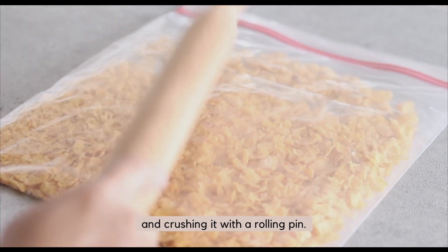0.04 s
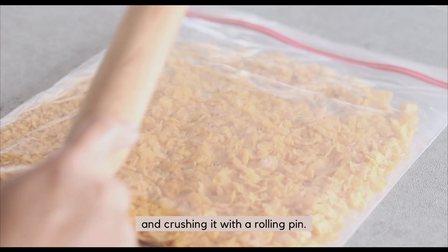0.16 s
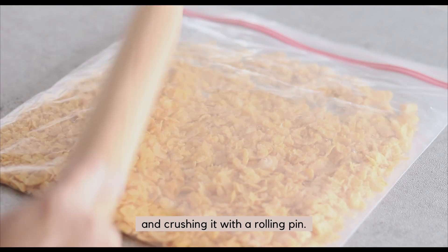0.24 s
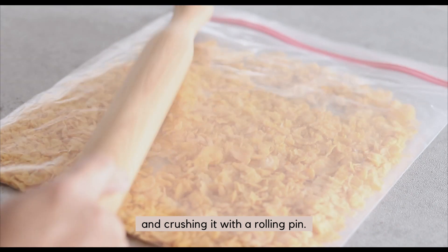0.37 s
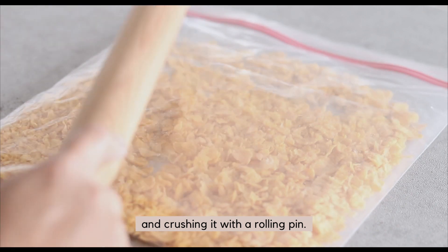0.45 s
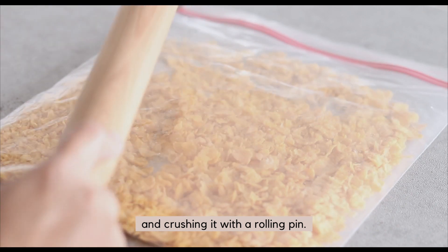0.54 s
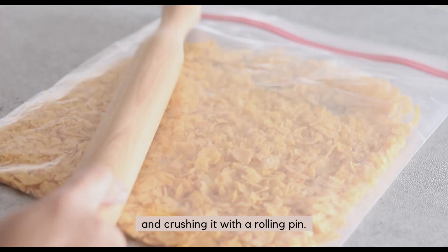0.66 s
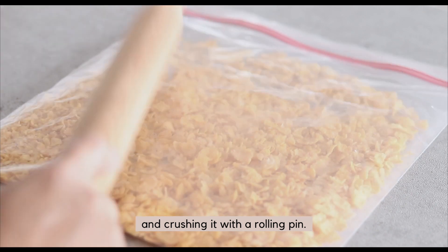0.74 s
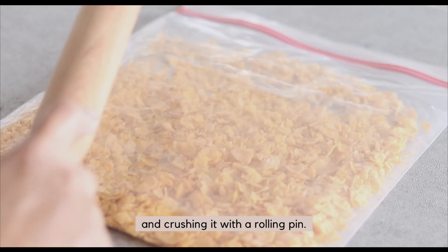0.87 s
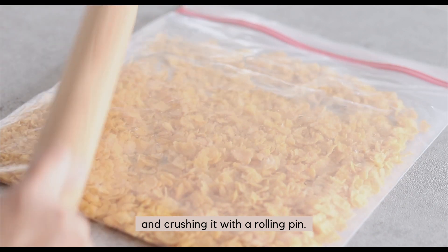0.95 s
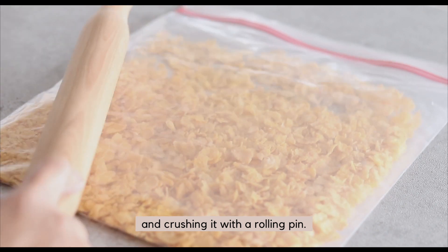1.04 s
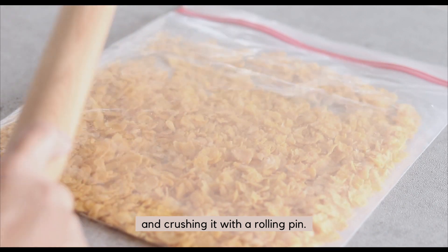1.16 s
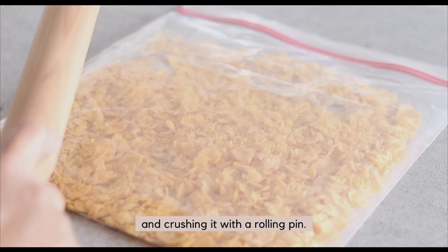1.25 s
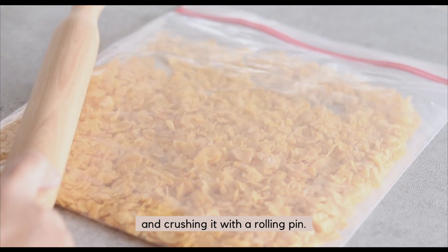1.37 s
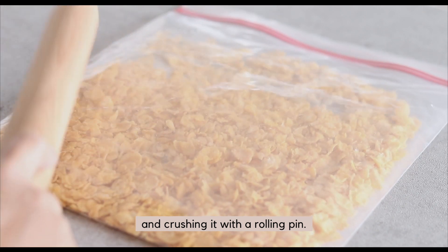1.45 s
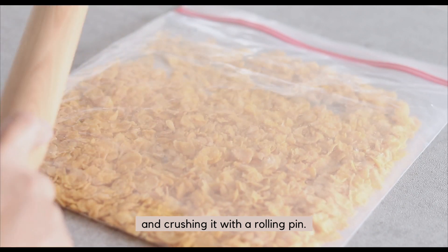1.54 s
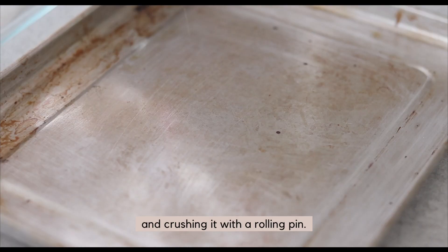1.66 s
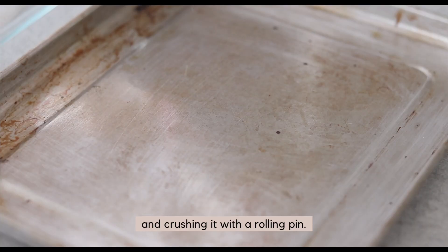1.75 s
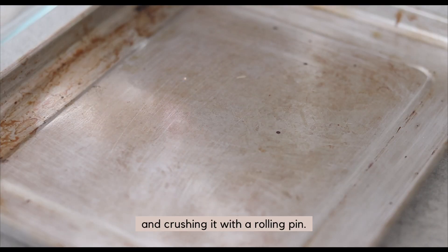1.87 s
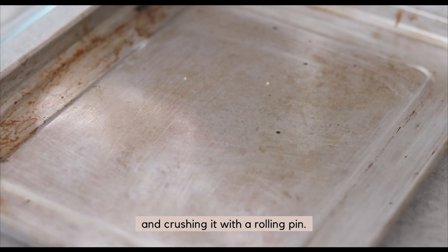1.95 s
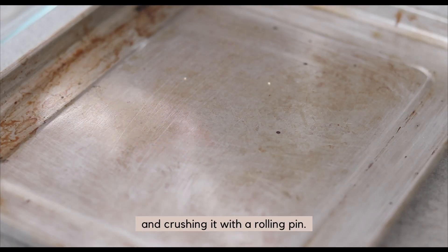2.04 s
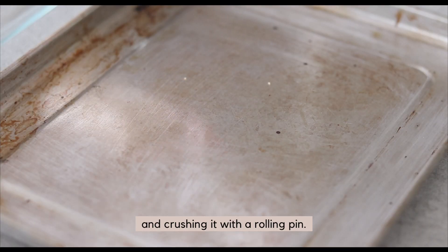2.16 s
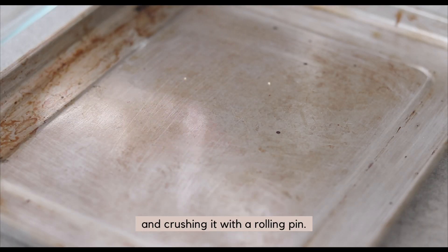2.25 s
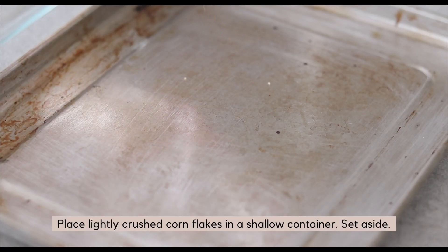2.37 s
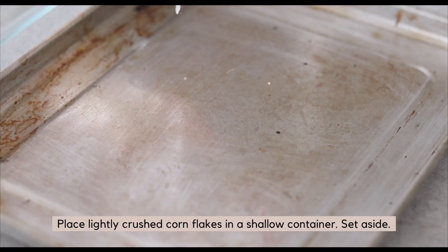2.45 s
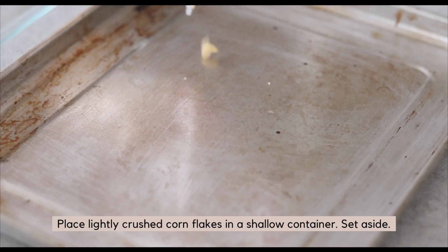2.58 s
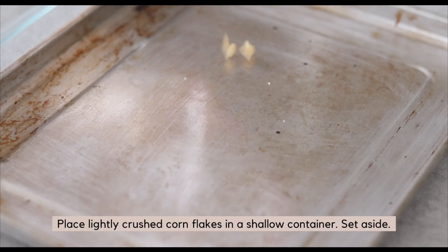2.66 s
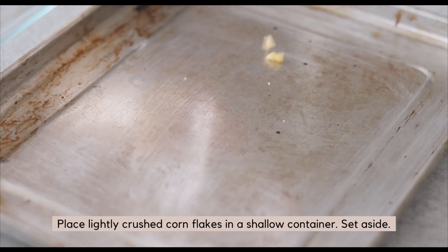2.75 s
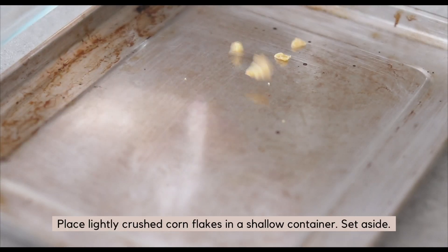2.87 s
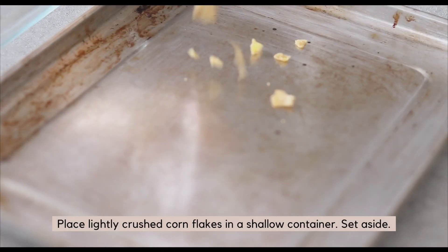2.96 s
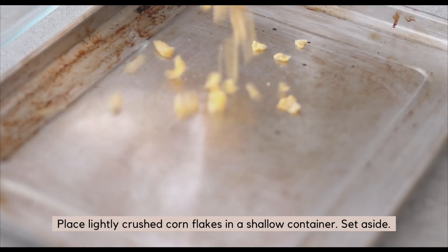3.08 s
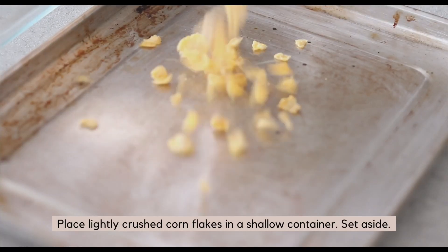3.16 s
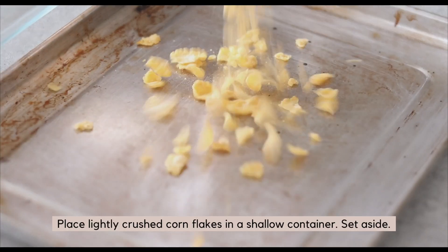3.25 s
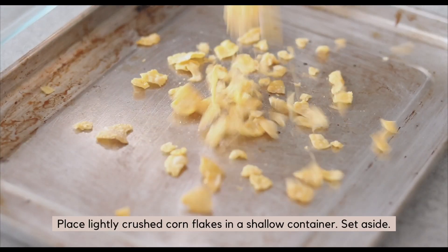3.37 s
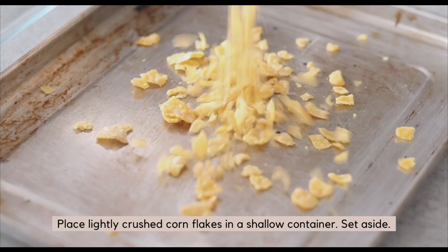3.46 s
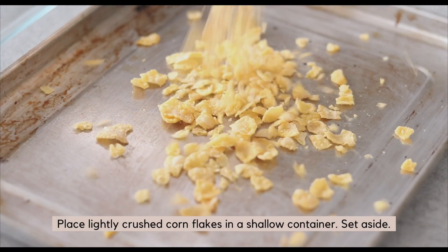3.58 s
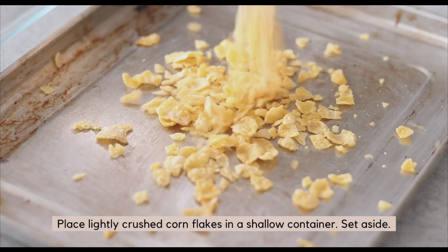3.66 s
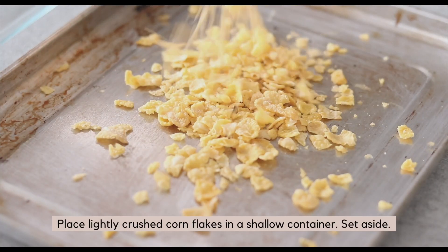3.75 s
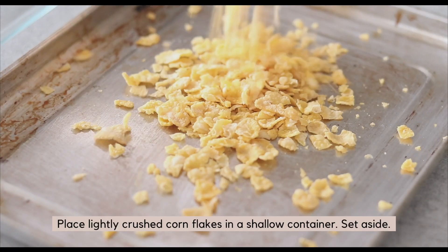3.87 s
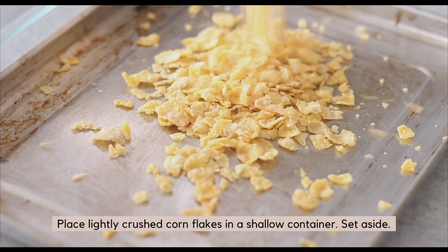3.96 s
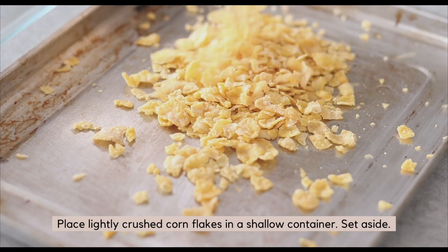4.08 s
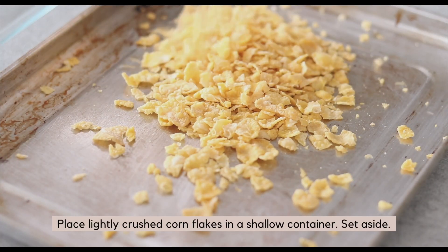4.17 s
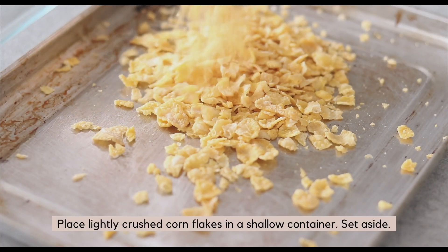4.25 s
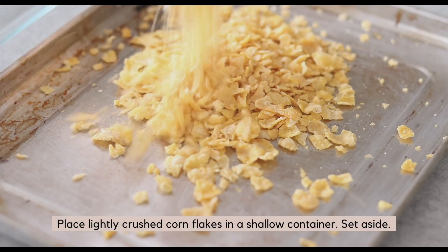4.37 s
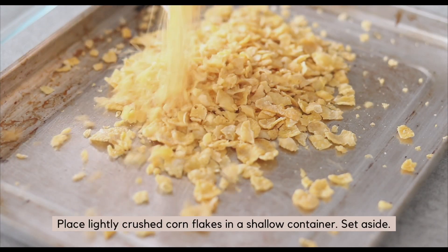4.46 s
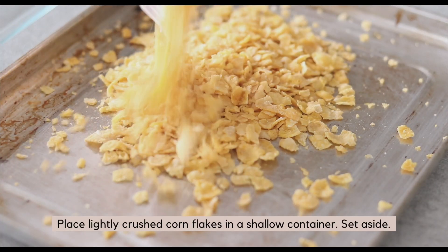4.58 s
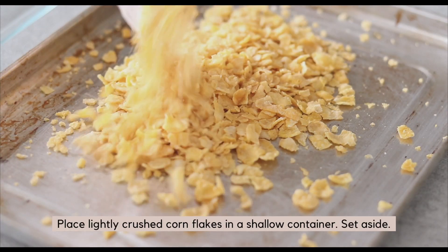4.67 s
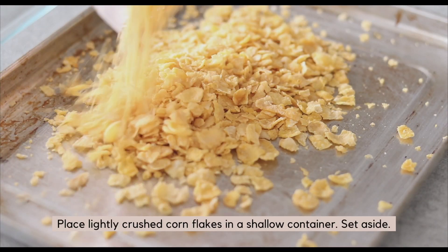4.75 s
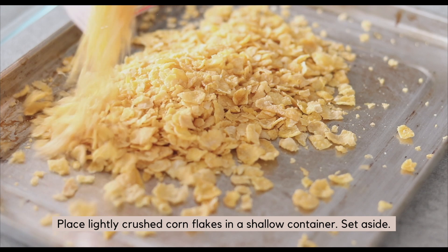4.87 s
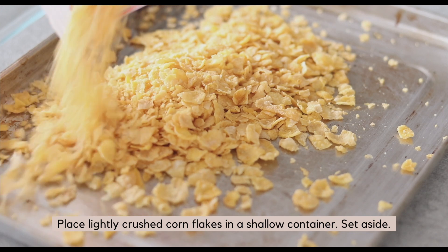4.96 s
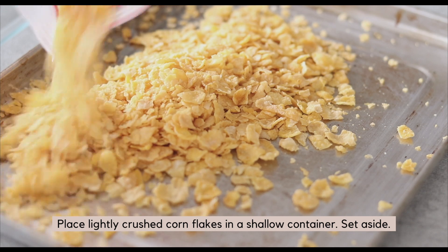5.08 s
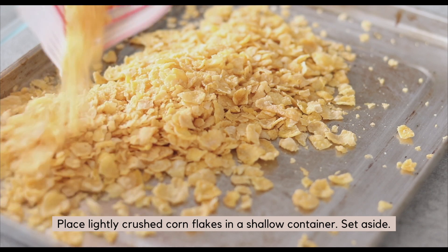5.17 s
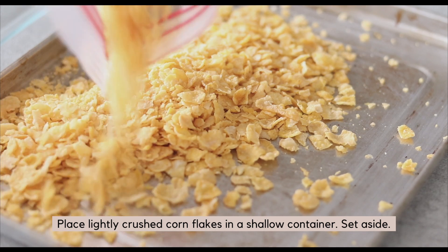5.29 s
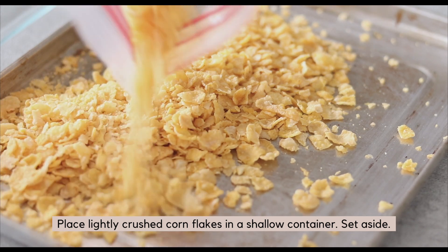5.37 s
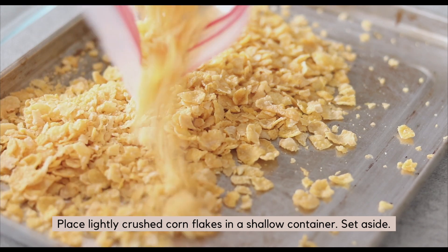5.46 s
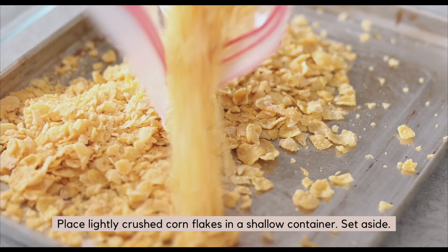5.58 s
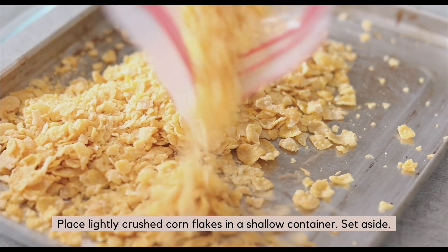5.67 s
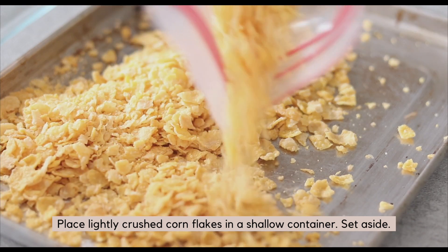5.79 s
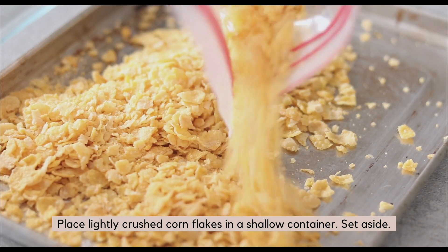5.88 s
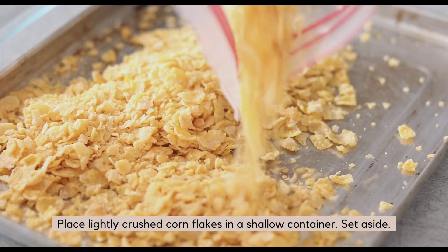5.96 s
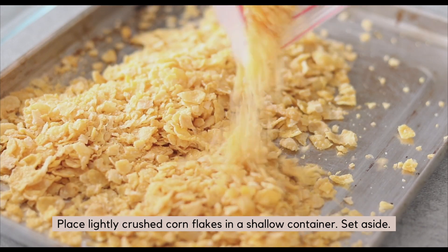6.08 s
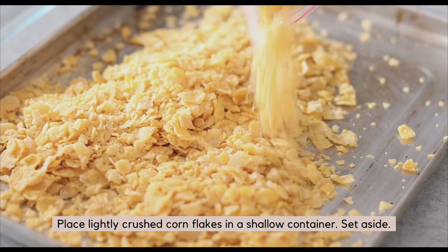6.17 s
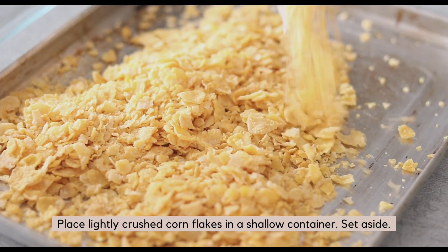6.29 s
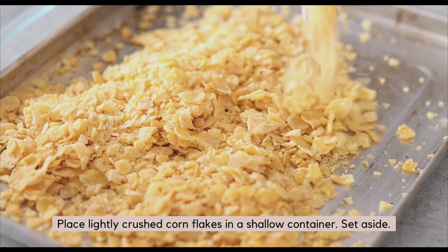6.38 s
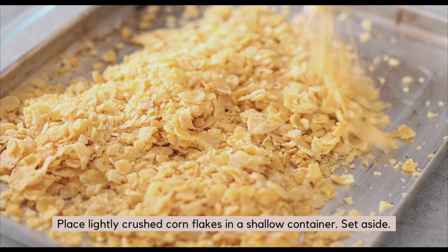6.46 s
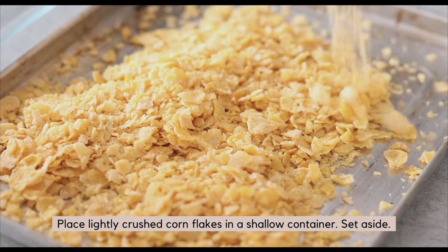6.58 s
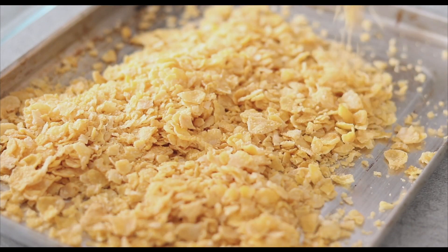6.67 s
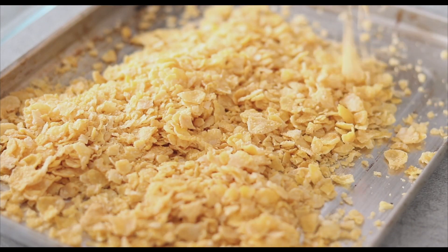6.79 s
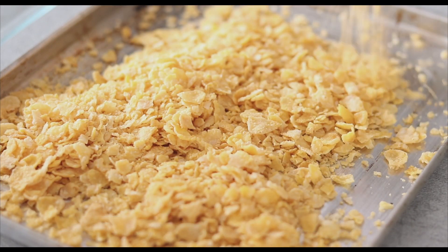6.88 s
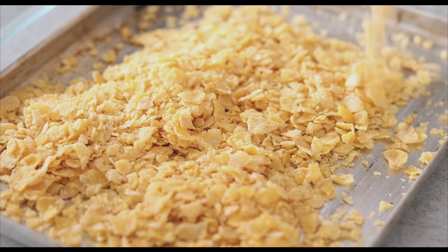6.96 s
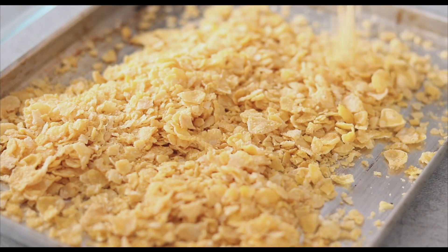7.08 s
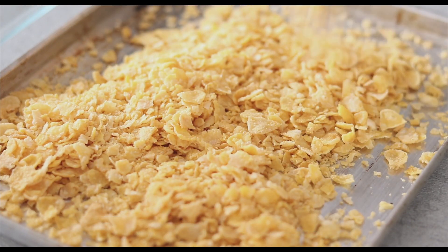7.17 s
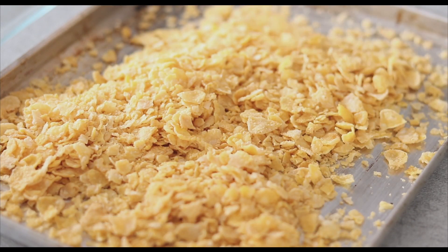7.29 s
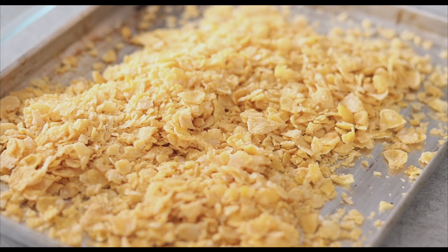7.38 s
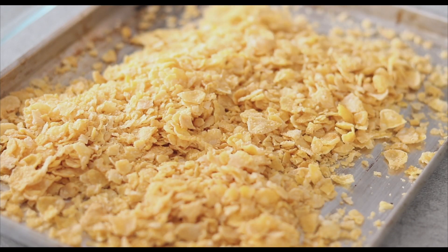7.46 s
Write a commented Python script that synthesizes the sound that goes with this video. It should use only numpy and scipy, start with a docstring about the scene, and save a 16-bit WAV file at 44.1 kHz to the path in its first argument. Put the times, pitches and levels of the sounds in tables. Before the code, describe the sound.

A still, hard-walled kitchen with very faint room tone. Five loud rolling-pin blows hit a bag of dry flakes on a counter, at about 0.0, 0.4, 0.7, 1.1 and 1.4 seconds. Each is a quick swelling crunch ending in a damped knock, with shards settling, a bright short echo and a low boom. At 1.7 the sound cuts abruptly to a soft appliance hum over low rumble, with a plastic bag rustling in quick shakes. Stray flakes tick and ping on bare steel from 1.8 to 3.1. Around 3.2 a dense, crisp rush pours out, strongest until about 3.8, with sharp metallic clinks. As the heap grows, the ringing fades into drier patter. Shaken surges continue from 4.5 to 6.2, then thinner trickles and light rustles last until 7.5. Close, centred mono pickup.

```python
"""In a still, hard-walled kitchen a wooden rolling pin pounds a bag of dry flakes on a counter five times:
noise grains crunch in a quick swell, damped counter modes knock, and the room echoes and booms.
After a cut the bag is tipped and shaken: banded noise rustles while flakes slide out, tick and ring
on a bare steel pan, then patter on the heap. An appliance hums softly over a low rumble.
One microphone feeds both channels."""
import sys
import numpy as np
from scipy import signal
from scipy.fft import rfft, irfft, next_fast_len
from scipy.io import wavfile
from scipy.ndimage import uniform_filter1d, map_coordinates

SR = 44100
rng = np.random.default_rng(int(sys.argv[2]) if len(sys.argv) > 2 else 0)


def to_wav(sig):
    """Store sig (one row per channel, or 1-D mono) as 16-bit WAV at the path in sys.argv[1].

    Samples outside -1..1 are clipped; the rate is SR.
    """
    pcm = np.clip(np.atleast_2d(sig), -1, 1) * 32767
    pcm = np.round(pcm).astype(np.int16)
    wavfile.write(sys.argv[1], SR, pcm.T)  # frames by channels


N = 332073
CUT_S = 1.7  # the pounding ends and the pouring begins


def amp(db):
    """Decibels to a linear factor."""
    return 10 ** (np.asarray(db) / 20)


def unit(x):
    """Scale to an RMS of one."""
    return x / np.sqrt(np.mean(x ** 2) + 1e-20)


def along(points, hz):
    """Read (freq_hz, value) points on a log frequency axis."""
    f, v = np.transpose(points)
    return np.interp(np.log(hz + 1), np.log(f + 1), v)


def curves(rows):
    """One value per sample for each column after the time."""
    s, *cols = np.transpose(rows)
    return [np.interp(np.arange(N) / SR, s, c) for c in cols]


def wobble(rate):
    """A smooth random curve with rate knots a second."""
    knots = rng.standard_normal(int(N * rate / SR) + 4)
    return map_coordinates(knots, [np.arange(N) * rate / SR])


def filtered(x, response):
    """Multiply the spectrum of x by a complex response of frequency."""
    m = next_fast_len(x.shape[-1] + SR // 4)
    return irfft(rfft(x, m) * response(np.fft.rfftfreq(m, 1 / SR)), m)[..., :x.shape[-1]]


def coloured(x, spectrum):
    """Give x a spectrum of (freq_hz, level_db) points and an RMS of one."""
    return unit(filtered(x, lambda hz: amp(along(spectrum, hz))))


def crackle(size, spread_db, grain_s):
    """Noise made of short grains whose sizes scatter widely."""
    step_s = .0004
    knots = rng.standard_normal(int(size / SR / step_s) + 4)
    grain = np.interp(np.arange(size) / SR / step_s, np.arange(len(knots)), knots)
    grain = unit(uniform_filter1d(grain, max(1, round(grain_s * SR))))
    return unit(amp(spread_db * grain) * rng.standard_normal(size))


def ring(hz, t60, t):
    """One damped mode, down 60 dB after t60 seconds."""
    return amp(-60 * t / t60) * np.sin(2 * np.pi * hz * t)


# How long the kitchen rings: freq_hz, t60_s
ROOM_DECAY = [(150, 0.38), (420, 0.42), (1100, 0.62), (2900, 0.65), (7700, 0.6), (15000, 0.28)]
# Colour of the echo as it starts: freq_hz, level_db
ECHO_COLOUR = [(100, 11), (400, 4.5), (1500, -1), (4000, -2.5), (9000, -3), (16000, -2.5)]


def kitchen(x, gap_s):
    """Echo off hard walls: a noise tail, silent up to gap_s, whose frequencies die at their own speeds."""
    hz, t, z = signal.stft(rng.standard_normal(SR // 2), SR, nperseg=256)
    fade_db = along(ECHO_COLOUR, hz)[:, None] - 60 * t / along(ROOM_DECAY, hz)[:, None]
    tail = signal.istft(z * amp(fade_db), SR, nperseg=256)[1]
    tail *= np.arange(len(tail)) / SR > gap_s
    return signal.fftconvolve(x, tail / np.linalg.norm(tail))[:len(x)]


# Spectrum of the still kitchen: freq_hz, level_db
AIR = [(18, -64), (30, -19), (163, -15), (234, -9), (326, -14.5), (414, -15), (2310, -22.5), (9000, -41),
       (11700, -75), (19800, -120)]


def still_air():
    """The quiet kitchen behind the pounding: steady coloured noise."""
    return amp(-56.0) * coloured(rng.standard_normal(N), AIR)


# Spectrum of the appliance drone: freq_hz, level_db
HUM = [(100, -22), (170, -3), (220, 1), (330, 3.5), (415, -5), (592, -1.5), (751, -8.5), (900, 1.5),
       (1170, -50), (1980, -120)]
# Spectrum of the low rumble: freq_hz, level_db
RUMBLE = [(15, -65), (25, -35), (39, -13), (102, -10.5), (123, 2.5), (170, -3.5), (220, -51), (370, -120)]
# Level of the rumble before its random swing: time_s, level_db
RUMBLE_LEVEL = [(1.75, -62.5), (2.4, -66.5), (2.85, -57.5), (3.3, -61), (4.0, -59), (5.1, -63), (6.0, -60),
                (7.5, -62.5)]


def hum():
    """Appliance drone beside the pan over a low rumble that comes and goes, both of coloured noise."""
    drone = amp(-51.5 + 0.55 * wobble(6.4)) * coloured(rng.standard_normal(N), HUM)
    rumble_db = curves(RUMBLE_LEVEL)[0] + 2 * wobble(4)
    return drone + amp(rumble_db) * coloured(rng.standard_normal(N), RUMBLE)


# Shakes of the bag, nearly all with a surge of flakes, one with a dip: time_s, surge_db over the stream
SHAKES = [(1.703, 10), (1.832, 7), (1.958, 6.5), (2.095, 8.5), (2.219, 5), (2.343, 6), (2.49, 9),
          (2.725, 1), (3.073, 3), (3.175, 3.5), (3.265, 1.5), (3.448, -2.5), (3.538, 4.5), (4.478, 4),
          (4.62, 1.5), (4.899, 5), (5.041, 4.5), (5.166, 1.5), (5.43, 4), (5.566, 5), (5.715, 7),
          (5.853, 3), (5.99, 3), (6.136, 6), (6.537, 5.5), (6.932, 6.5), (7.088, 7), (7.527, 6)]


def surges():
    """Change of flow in dB: a straight ramp to each shake's value and a straight ramp back after it."""
    t, ramp_in_s, ramp_out_s = np.arange(N) / SR, 0.05, 0.055
    return sum(db * np.interp(t, [s - ramp_in_s, s, s + ramp_out_s], [0, 1, 0]) for s, db in SHAKES)


# Spectrum of the plastic bag: freq_hz, level_db
RUSTLE = [(240, -55), (400, -8.5), (484, -10), (598, -3.5), (1000, -2.5), (1330, -1.5), (1530, -0.5),
          (3310, -6.5), (5000, -8.5), (6500, -34), (11000, -120)]


def bag_rustle(rustle_db, clumps):
    """The bag above the pan: grainy noise whose level also wavers and slightly follows the clumps."""
    level_db = rustle_db + 0.21 * clumps + 1.2 * wobble(25)
    return amp(level_db) * coloured(crackle(N, 1.6, 0.0057), RUSTLE)


def pings(rate):
    """Stiff flakes knocking together, rate a second, each a brief ring at its own pitch and size."""
    when, pitch, size = rng.random((int(rate * N / SR), 3)).T
    t = np.arange(300) / SR
    hz = 2000 * 5.5 ** pitch[:, None]
    grains = amp(-4.5 * np.log(size[:, None] + 0.03)) * ring(hz, 45 / hz, t)
    places = (when[:, None] * N).astype(int) + np.arange(len(t))
    return unit(np.bincount(places.ravel(), grains.ravel())[:N])


# Spectrum of the falling flakes: freq_hz, level_db
PATTER = [(1180, -17), (2000, -12.5), (2660, -11), (3140, -11), (4970, -5), (5570, -2), (8660, 0),
          (13600, -7), (15900, -10)]


def patter(patter_db, clumps):
    """The stream landing: a dense bed of ticks, stray ticks and flake pings."""
    ticks = crackle(N, 2.3, 0.01) + 0.87 * crackle(N, 4.8, 0.00062) + .65 * pings(1200)
    return amp(patter_db + clumps) * coloured(ticks, PATTER)


# Single flakes and clumps: start_s, level_db, body_db at 1300 Hz before the mix, t60_s, ping_hz
LANDINGS = [(1.842, -20.5, -8, 0.034, 3130), (2.001, -21.5, -27, 0.031, 8450),
            (2.371, -20.5, -5.5, 0.025, 2010), (2.4925, -17, -9, 0.043, 3680),
            (2.501, -22, -17, 0.027, 2650), (2.566, -22, -25, 0.012, 9000), (2.576, -15.5, -3, 0.027, 2910),
            (2.6692, -21.5, 7.5, 0.018, 3000), (2.6948, -19, -22, 0.077, 8850),
            (2.7397, -24, -15, 0.03, 2160), (2.757, -28, -15, 0.02, 5000), (2.771, -25, -21, 0.02, 6640),
            (2.7793, -17, -24, 0.07, 6640), (2.8494, -17.5, -12, 0.029, 5000),
            (2.9353, -13, -19, 0.1, 2680), (3.022, -24, -15, 0.03, 7800), (3.061, -18, -20, 0.033, 2500),
            (3.1078, -13, -23, 0.014, 7960), (3.1595, -14, -11, 0.04, 3680), (3.2348, -11, -5, 0.095, 6500),
            (3.2636, -17, -3, 0.044, 4600), (3.3114, -17, -15, 0.03, 8600), (3.3634, -6, -17, 0.08, 8370),
            (3.4275, -9, -14, 0.066, 7800), (3.454, -7.5, -15, 0.062, 7530), (3.464, -15, -16, 0.059, 7260),
            (3.521, -15, -14, 0.052, 8300), (3.5341, -2.5, -21, 0.034, 8500), (3.706, -17, -3, 0.036, 8370),
            (3.8278, -13.5, -12, 0.054, 4900), (3.9893, -10, -28, 0.09, 7800),
            (4.041, -16.5, -13, 0.079, 8850), (4.1607, -17.5, -13, 0.033, 6840),
            (4.267, -12.5, -35, 0.039, 7960), (5.941, -23.5, -21, 0.033, 7300),
            (6.4166, -18.5, -19, 0.09, 7690), (6.52, -26, -14, 0.09, 8600), (6.6583, -21, -11, 0.03, 8350),
            (6.8592, -23, -17, 0.03, 9500), (6.9103, -26, -20, 0.024, 6670),
            (6.986, -22.5, -11, 0.033, 8550), (7.385, -22, -28, 0.071, 4900)]
# Treble of a landing at 12500 Hz, duller before the stream runs: time_s, level_db
TICK_AIR = [(2.6, -10), (3.2, -3.5)]


def landings():
    """Single flakes and clumps: a sharp tick, the ping of the flake, then a short rattle, each with its tilt."""
    out, t = np.zeros(N + SR), np.arange(4096) / SR
    crest_db, ping_db = 10.5, -5.5  # a rattle's peak over its mean; the ping against the tick
    for s, db, body_db, t60, ping_hz in LANDINGS:
        envelope = amp(-60 * t / max(t60, .003)) + 0.89 * amp(-60 * t / 0.0015)
        rattle = envelope * crackle(len(t), 0.72, 0.00068)
        treble_db = np.interp(s, *np.transpose(TICK_AIR))
        tilt = [(500, body_db - 31), (1300, body_db), (2600, body_db + 10.5),
                (5500, 0), (8500, 0), (12500, treble_db)]
        tick = filtered(rattle, lambda hz: amp(along(tilt, hz)))
        tick += amp(ping_db) * ring(ping_hz, 0.034, t)
        out[round(s * SR):][:len(t)] += amp(db - crest_db) * tick
    return out[:N]


# Resonances of the bare steel pan: freq_hz, width_hz, level_db
PAN = [(1330, 130, -9), (1700, 120, -8), (2660, 54, -2), (3400, 70, -2), (3670, 49, -3), (4660, 48, 0),
       (5000, 96, 0), (5630, 38, -4), (6700, 47, -4), (7660, 42, -2), (7860, 84, -2), (8550, 71, 0),
       (8830, 63, -2), (9210, 68, -5), (9630, 150, -6), (9980, 25, -5), (10400, 160, -6), (13300, 86, -11)]
# Modes that still ring under the heap: freq_hz, width_hz, level_db
LOADED = [(1330, 140, 1), (4950, 160, -2)]
# How strongly the flakes ring the steel: time_s, drive (0-1)
STEEL_DRIVE = [(1.7, 0.4), (2.8, 0.16), (3.3, 1), (3.9, 0.52), (4.6, 0.38), (5.3, 0), (7.53, 0)]


def steel(modes):
    """Response of steel to a tap: a sum of resonances with alternating signs."""
    def response(hz):
        total = 0
        for k, (centre, width, db) in enumerate(modes):
            resonance = 1j * hz * width / (centre * centre - hz * hz + 1j * hz * width)
            total = total + (-1) ** k * amp(db) * resonance
        return total
    return response


def pan_ring(taps):
    """Taps excite the bare steel; as the heap builds up, only the modes that survive under it ring."""
    drive, = curves(STEEL_DRIVE)
    spots = rng.standard_normal(N)  # every flake meets the steel at another spot
    rung = amp(10) * filtered(drive * taps * spots, steel(PAN))
    heaped = np.clip((np.arange(N) / SR - 3.6) / 1.4, 0, 1)
    heap_taps = heaped * amp(2.1 * wobble(6)) * taps * rng.standard_normal(N)
    return rung + amp(6) * filtered(heap_taps, steel(LOADED))


# The stream between shakes: time_s, patter_db, rustle_db
FLOW = [(1.7, -51.5, -49.5), (2.42, -53, -48), (2.64, -48.5, -44.5), (2.78, -49, -45), (3.02, -44.5, -43.5),
        (3.13, -39.5, -45.5), (3.22, -30.5, -40.5), (3.67, -33.5, -41.5), (3.81, -34.5, -42.5),
        (4.38, -38, -43), (4.83, -39.5, -43), (5.17, -37.5, -47.5), (5.35, -46.5, -49), (5.63, -40.5, -44),
        (6.07, -43, -48), (6.45, -41.5, -46.5), (6.86, -49, -50), (7.03, -42.5, -46), (7.39, -44, -48.5),
        (7.44, -48.5, -49.5), (7.53, -44.5, -49)]


def pour():
    """Flakes stream from the shaken bag onto steel and heap, and the kitchen answers."""
    patter_db, rustle_db = curves(FLOW)
    surge_db = surges()
    clumps = 0.9 * wobble(40)  # flakes arrive in bunches (dB)
    taps = patter(patter_db + surge_db, clumps) + landings()
    bag = bag_rustle(rustle_db + 0.84 * surge_db, clumps)  # the bag swings less wide than the flakes
    dry = (np.arange(N) / SR > CUT_S) * (taps + pan_ring(taps) + bag)
    return dry + amp(-11.5) * kitchen(dry, 0.002)


# Blows of the pin: start_s (first contact), level_db, four counter mode levels_db,
# boom_db against the blow, crush_s (time scale of the crunch), echo_lift_db (doubled at 3300 Hz)
BLOWS = [(0.0154, -2.5, -26, -11, -14, -26, -30.5, 0.0086, 1.3),
         (0.382, -2.5, -27.5, -46, -13.5, -28, -30, 0.0094, 1.2),
         (0.7261, -1, -23.5, -8, -19.5, -23, -29, 0.0092, 2.6),
         (1.095, -3, -31.5, -32, -24, -10, -26.5, 0.009, 2.3),
         (1.4339, -4, -28, -29, -17, 0.5, -23.5, 0.0085, 1.4)]
# Breaking flakes: freq_hz, level_db
CRUNCH = [(180, -60), (300, -22.5), (1400, -4.5), (1950, -5), (2630, -7), (3270, -8), (7010, -15.5),
          (7620, -14.5), (11000, -19), (15800, -28.5)]
# Slab and pin modes, struck at strengths set by the spot: freq_hz, level_db, t60_s
COUNTER = [(279.5, -5, 0.09), (582, -5.5, 0.025), (858, -0.5, 0.034), (1418, -6.5, 0.021)]
# Low room modes: freq_hz, signed strength at the microphone, t60_s
BOOM = [(59.6, -.18, .4), (79, .4, .36), (103, .31, .38), (112.6, 1, .205), (120.9, .19, .39)]


def room_boom(t):
    """Low room modes, which swell in just after the blow and then decay."""
    lag = np.maximum(t - .0116, 0)
    return (1 - np.exp(-lag / .025)) * sum(g * ring(hz, t60, lag) for hz, g, t60 in BOOM)


def pin():
    """The crunch of flakes swells until the pin meets the slab, which knocks; the room answers and booms."""
    out, t = np.zeros(N + SR), np.arange(SR // 2) / SR
    for s, db, *spot_db, boom_db, crush_s, lift_db in BLOWS:
        u = (t - .003) / crush_s  # the bag gives way a little before the first flakes snap
        rise_db = -26 * np.abs(1 - np.minimum(u / 0.58, 1)) ** 1.74
        swell = amp(rise_db - 30.3 * np.maximum(u - .8, 0))
        crunch = 0.38 * swell * coloured(crackle(len(t), 2.7, 0.00099), CRUNCH)

        late = np.maximum(t - .003 - 0.89 * crush_s, 0)  # time since the pin bottomed out
        knock = sum(amp(level + mode_db) * ring(hz, t60, late)
                    for level, (hz, mode_db, t60) in zip(spot_db, COUNTER))

        # the walls hear the crunch from all sides, which evens out its colour
        lift = [(1500, 0), (3300, 2 * lift_db), (9000, 0)]
        click = 1. * (t == t[430])
        even = filtered(click, lambda hz: amp(along(CRUNCH, hz) + along(lift, hz)))
        even *= np.linalg.norm(crunch) / np.linalg.norm(even)
        echo = amp(-11.0) * kitchen(even, 0.0094)
        echo += amp(-12.5) * kitchen(knock, 0.002)
        echo += amp(-13.5) * kitchen(crunch, 0.0037)

        # shards shift in the bag
        settle = amp(-25.5 - 60 * late / 0.22) * (late > 0) * coloured(crackle(len(t), 4.4, 0.0018), CRUNCH)
        blow = crunch + knock + echo + settle + amp(boom_db) * room_boom(t)
        out[round((s - .005) * SR):][:len(t)] += amp(db) * blow
    return out[:N]


def scene():
    """Pounding in the still kitchen, then a cut to the pour beside the humming appliance."""
    first = np.arange(N) / SR < CUT_S
    mono = np.where(first, pin() + still_air(), pour() + hum())
    return np.array([mono, mono])


def record(dry):
    """The loudest peaks are rounded, the deep bass rolls off and nothing is kept above the band limit."""
    top_hz, bass_hz = 15900, 56.5
    rounded = dry / (1 + np.abs(dry / .72) ** 4) ** (1 / 4)

    def band(hz):
        return np.clip((top_hz - hz) / 200 + .5, 0, 1) / np.sqrt(1 + (bass_hz / (hz + 1)) ** 8)
    return filtered(rounded, band)


dry = scene()
out = record(dry)
to_wav(out)
```